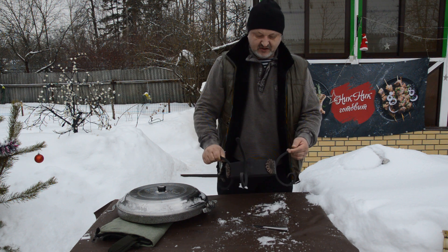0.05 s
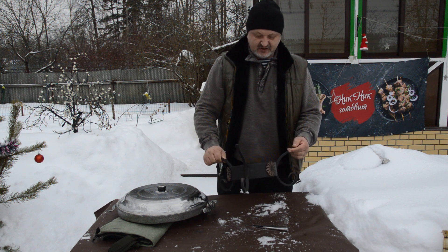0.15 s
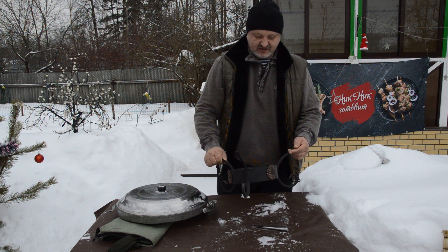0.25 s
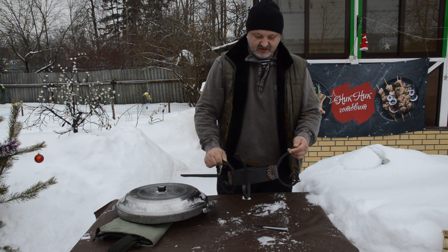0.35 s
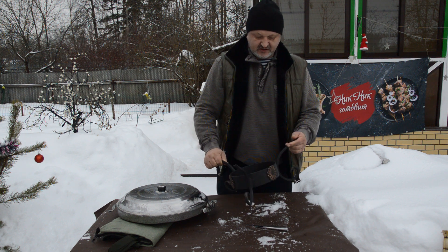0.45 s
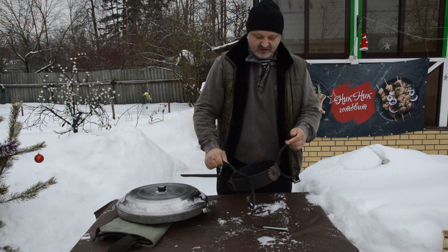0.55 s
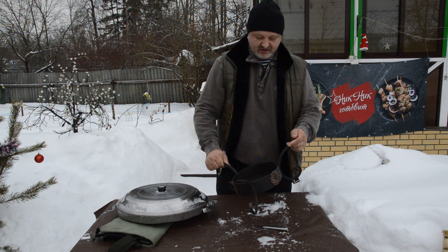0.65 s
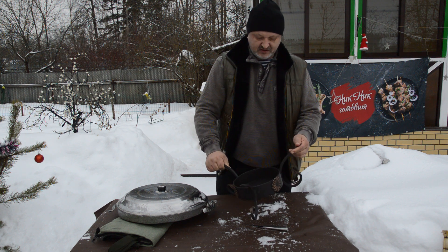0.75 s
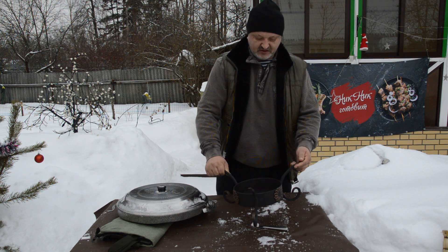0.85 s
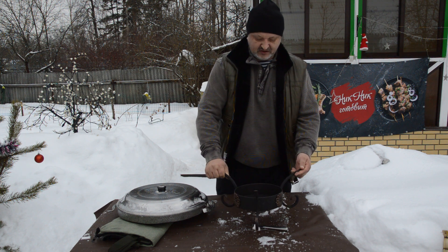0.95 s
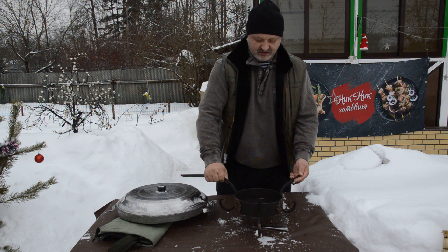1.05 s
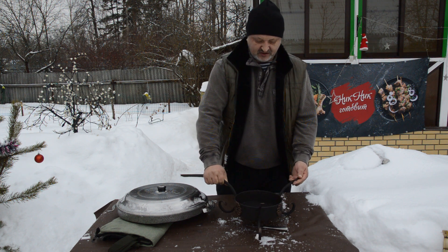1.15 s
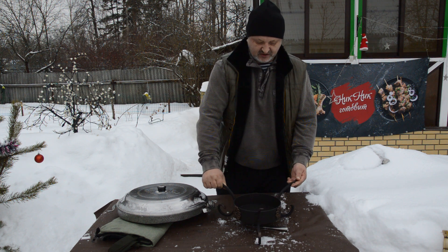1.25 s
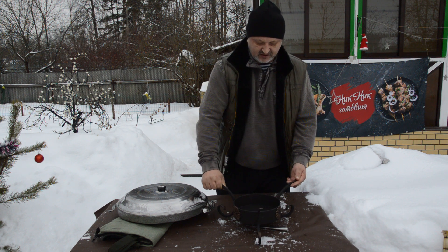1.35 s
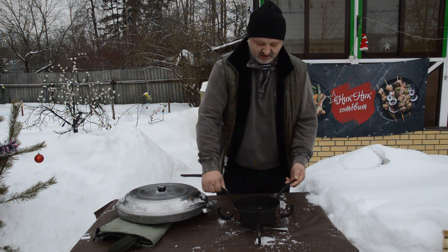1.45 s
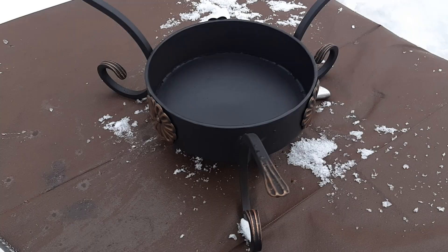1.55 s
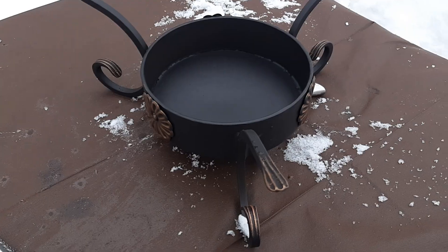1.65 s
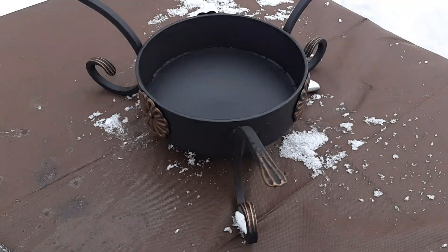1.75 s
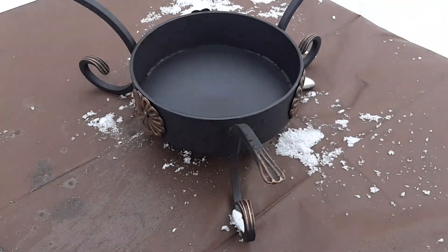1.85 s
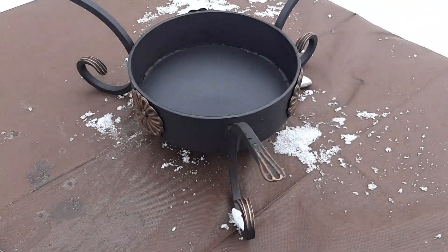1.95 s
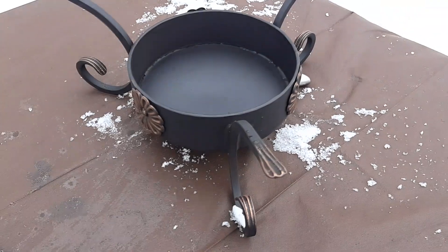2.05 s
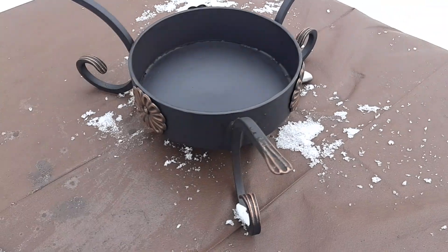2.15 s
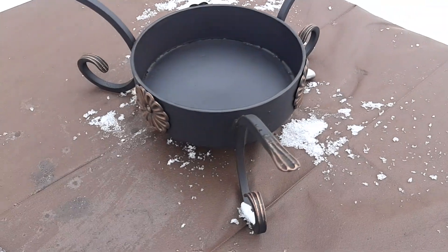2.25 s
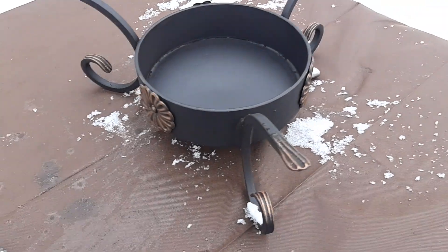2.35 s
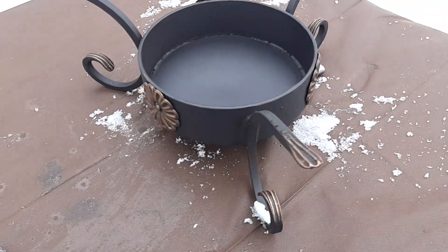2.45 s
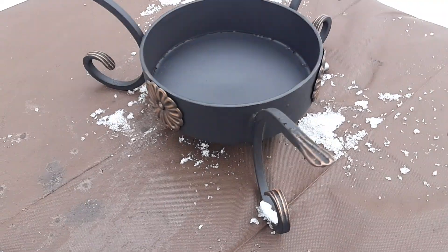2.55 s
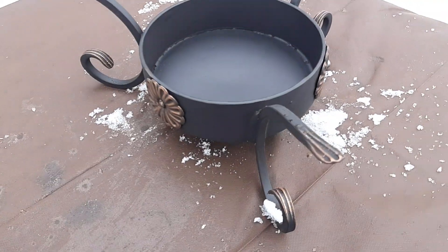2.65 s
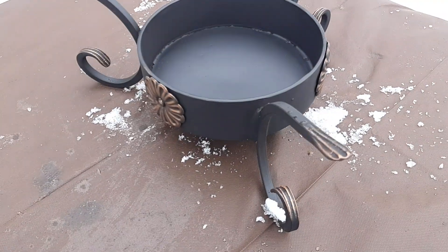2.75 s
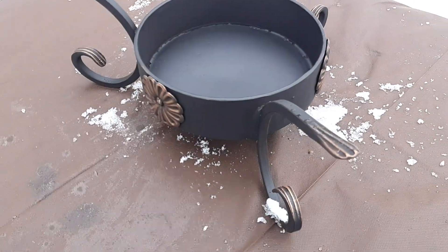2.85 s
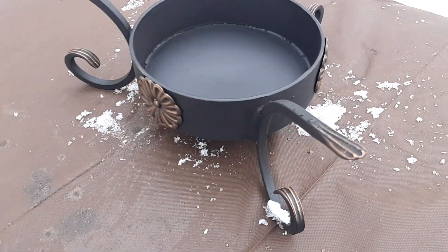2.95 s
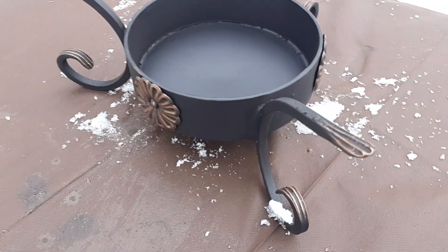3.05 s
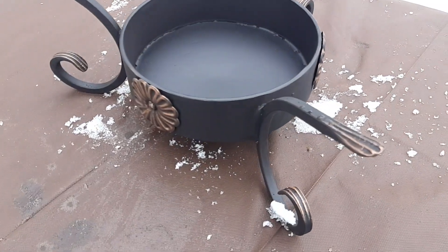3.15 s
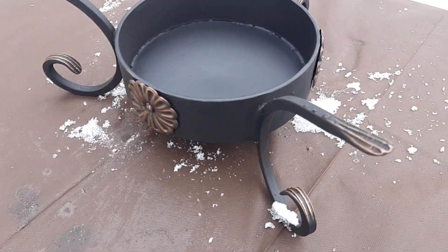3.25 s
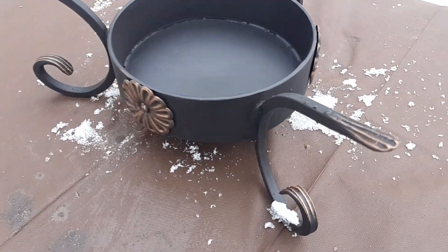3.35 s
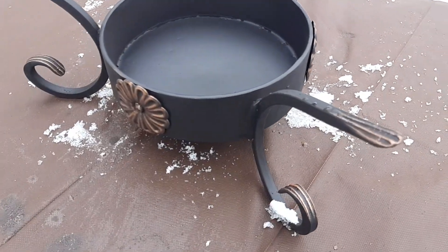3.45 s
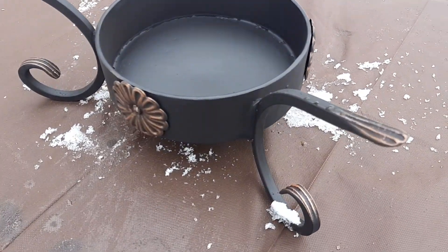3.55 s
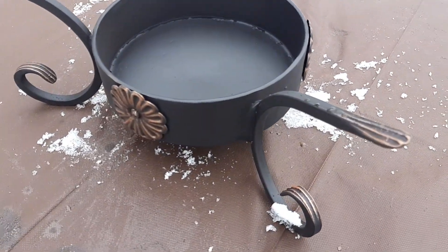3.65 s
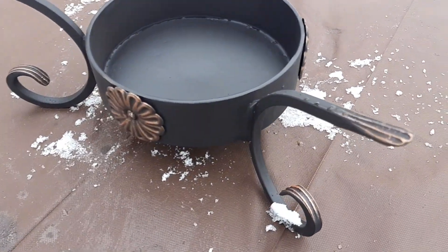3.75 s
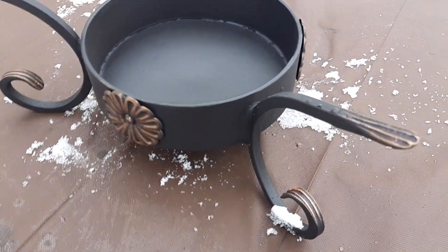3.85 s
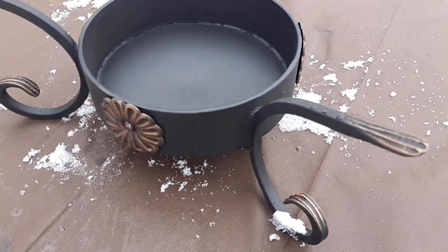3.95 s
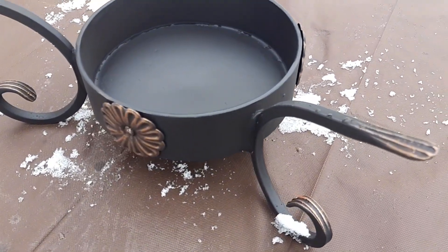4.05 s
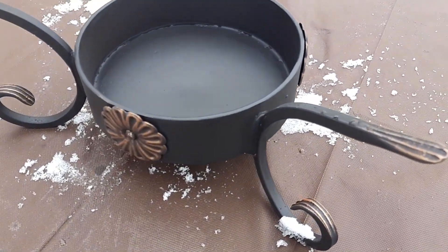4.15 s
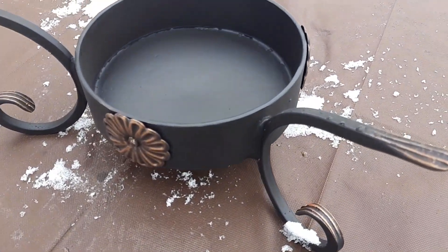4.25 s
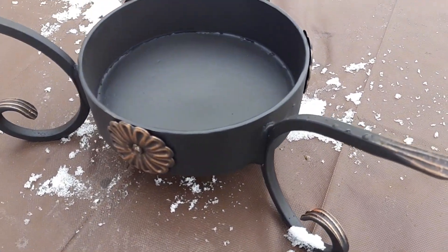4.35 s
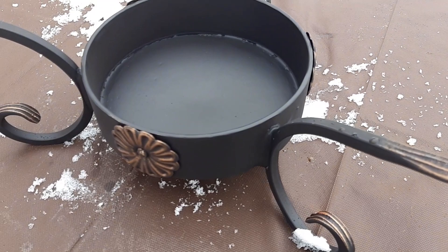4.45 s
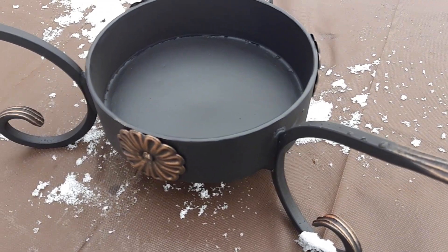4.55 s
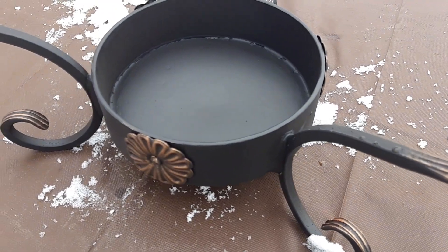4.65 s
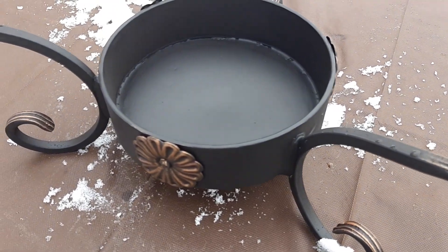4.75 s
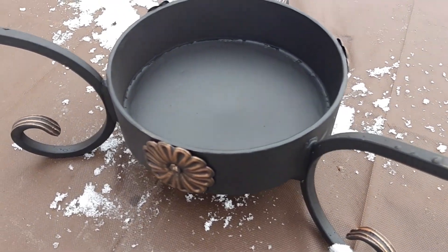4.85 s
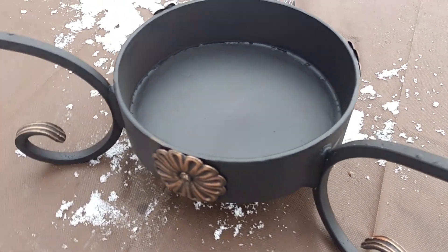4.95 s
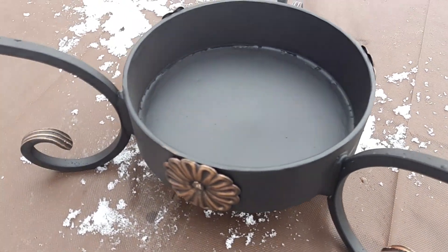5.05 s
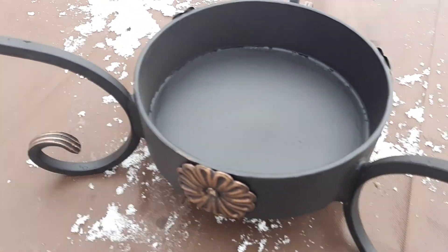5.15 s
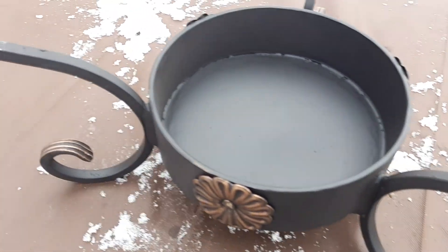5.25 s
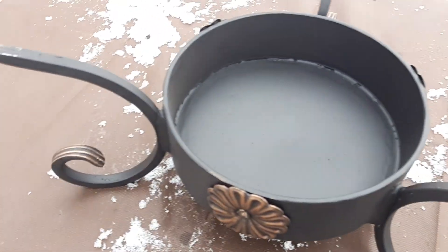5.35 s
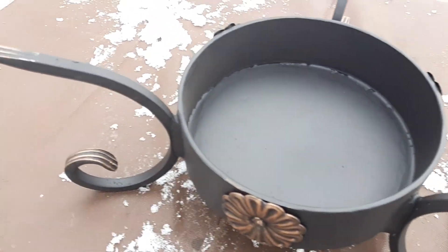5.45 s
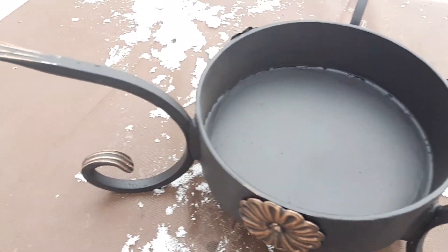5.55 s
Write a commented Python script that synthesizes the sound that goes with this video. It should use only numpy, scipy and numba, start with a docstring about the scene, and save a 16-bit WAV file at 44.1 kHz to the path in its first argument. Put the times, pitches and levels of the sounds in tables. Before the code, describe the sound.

In a snowy yard, low distant traffic rush and thin bird whistles precede a heavy steel stand landing on a covered table, with a boomy double thud and a second hard thump. The far microphone is nearly mono. After a brief near-silence, a close handheld stereo camera gives soft hiss with irregular plastic clicks, dull knocks and finger taps.

```python
"""A heavy steel stand thuds onto a covered table in a snowy yard: decaying modes, rumble and cracks of noise.
A bird's gliding tones, a steady thin tone and shaped traffic hiss join it in a distant, nearly mono
microphone with gain control. After a cut and a short near-silence, a hand-held stereo camera hears its own
two-port hiss while fingers make its plastic body click, knock, tap and rustle: noise and snaps through
shell resonances, single swings and low modes. Two faint tones dive and climb back."""
import sys
import numpy as np
from scipy import signal
from scipy.fft import rfft, irfft, next_fast_len
from scipy.io import wavfile
from scipy.ndimage import uniform_filter1d, map_coordinates
from numba import njit

SR = 44100
rng = np.random.default_rng(int(sys.argv[2]) if len(sys.argv) > 2 else 0)


def to_wav(sig):
    """Store sig (one row per channel, or 1-D mono) as 16-bit WAV at the path in sys.argv[1].

    Samples outside -1..1 are clipped; the rate is SR.
    """
    pcm = np.clip(np.atleast_2d(sig), -1, 1) * 32767
    pcm = np.round(pcm).astype(np.int16)
    wavfile.write(sys.argv[1], SR, pcm.T)  # frames by channels


def undo_db(level):
    """Turn decibels back into plain size, where 20 dB means ten times bigger."""
    steps = np.asarray(level, float) / 20
    return 10 ** steps


N = 246959

CUT_S, RESUME_S = 1.6005, 1.6335  # end of the first shot, start of the second
BACKGROUND_TOP_HZ = 15800

# The stand's legs land and rock. Each row: start in seconds, then boom, low drum, high drum and knock in dB.
BLOWS = [(1.2886, -8.5, -20.5, -20, -16.5), (1.2913, -11, -9, -20.5, -18.5), (1.3088, -13, -21, -26, -22.5),
         (1.3187, -12.5, -16, -34, -30.5), (1.34, -26, -10, -25.5, -33), (1.358, -32, -15.5, -30, -43),
         (1.372, -32, -18, -21, -40), (1.405, -32, -30.5, -30.5, -48), (1.433, -35, -23.5, -33, -48.5),
         (1.4937, -3.5, -14, -6.5, -15), (1.511, -24, -33, -7.5, -36), (1.533, -32, -35, -33, -28),
         (1.5524, -17.5, -30, -18, -36), (1.586, -29.5, -42, -19.5, -35)]
# The crust of snow gives twice under each blow. Each row: delay in seconds, level in dB over the knock.
CRACKS = [(0, -7), (.0026, 3)]
# Modes of the table top under the stand. Each row: frequency in Hz, strength in dB, 60 dB decay in seconds.
BOOM_MODES = [(64.5, -23, 0.55), (85.5, -18, 0.68), (114.2, -10.5, 0.075), (126, 3.5, 0.15),
              (144, 2.5, 0.12), (172, -5, 0.15)]
# Low drum modes of the blow. Each row: frequency in Hz, strength in dB, 60 dB decay in seconds.
LOW_DRUM_MODES = [(204, -9.5, 0.084), (225.4, -0.5, .14)]
# High drum modes of the blow. Each row: frequency in Hz, strength in dB, 60 dB decay in seconds.
HIGH_DRUM_MODES = [(254.5, -1, 0.13), (314, -10, 0.063), (373, -6.5, 0.085)]
# Modes of the knocked steel. Each row: frequency in Hz, strength in dB, 60 dB decay in seconds.
STEEL_MODES = [(402.5, -9, .1), (523.6, -2.5, 0.14), (570, 0.5, .1), (609, 2, .06), (729, -10, 0.19),
               (878, -10, 0.08), (1046, -6.5, 0.03), (1300, -13.5, .04), (1666, -15.5, .03)]
# Bright clicks. Each row: start in seconds, level in dB, colour at 2 kHz in dB, colour at 10 kHz in dB,
# thump through the hand in dB.
CLICKS = [(1.933, -34.5, 8, 0, -60), (2.3447, -42, -2, 5, -55), (2.4423, -39, 9, -10.5, -49),
          (2.58, -19, 2, -9.5, -36), (2.6212, -38, 3, -4, -40), (2.6388, -21, 1.5, -4.5, -33.5),
          (2.852, -45, -3, 2.5, -60), (2.8819, -25, -1.5, 4, -46.5), (3.0776, -13, -7.5, 0.5, -40),
          (3.236, -33, 10.5, 1, -59), (3.2715, -11, 2, 4.5, -32), (3.3937, -21, -4, -5.5, -43.5),
          (3.555, -40, -7, -14, -56), (3.5774, -29, -11, -6, -65), (4.064, -21, 17.5, 7.5, -42),
          (4.2206, -29, 3, 4, -55), (4.2484, -11.5, 1.5, -5, -39), (4.2623, -27, 8, -1.5, -40.5),
          (4.5896, -35, 9, 1, -58), (4.6194, -47, 3, 4, -58), (5.122, -43, -8, -13, -58),
          (5.1472, -39.5, -4, -21, -48)]
# Resonances of the camera shell. Each row: frequency in Hz, width in Hz, strength in dB.
SHELL_MODES = [(910, 90, 2), (1520, 520, 2), (2115, 560, -0.5), (3200, 870, -1.5), (4090, 650, 1.5),
               (4820, 640, 1), (5950, 614, 3), (6436, 720, 0.5), (8500, 1300, -13.5), (10160, 860, -2.5),
               (11830, 1600, -8), (14760, 3000, -7)]
# Dull knocks. Each row: start in seconds, level in dB, frequency in Hz, left over right in dB.
KNOCKS = [(2.7798, -15, 1940, -0.8), (3.258, -34.5, 680, -3), (4.0395, -40.5, 613, -11),
          (4.489, -44, 800, -2), (4.5899, -32, 850, -3.5), (4.62, -43, 500, -12), (4.978, -45.5, 445, -15),
          (5.067, -41.5, 614, 0.5), (5.086, -45, 500, -11), (5.114, -45, 800, -5), (5.17, -40, 700, -12),
          (5.4847, -28, 1650, -11), (5.529, -44, 605, -11)]
# Dull taps through the hand. Each row: start in seconds, level in dB, frequency in Hz.
TAPS = [(1.879, -43.5, 139), (2.345, -42, 121), (2.695, -44, 221), (3.294, -44, 223), (3.867, -45, 132),
        (4.037, -42, 241), (4.671, -45.5, 112), (4.827, -47, 113)]
# Spectrum of the sliding finger. Each row: frequency in Hz, relative density in dB.
SLIDE_SPECTRUM = [(300, -120), (900, -14), (3000, -10), (6000, 7), (8000, -2), (10500, 2), (15500, -4),
                  (17000, -120)]
# Whistles. Each row: start in seconds, length in seconds, first Hz, last Hz, level in dB.
CHIRPS = [(0.944, 0.148, 3330, 3220, -49), (1.19, .068, 4770, 4480, -39), (1.455, 0.14, 3200, 3240, -53.5)]
# Faint diving tones, left then right. Each row: bottom in seconds, speed in Hz per second, level in dB.
SWEEPS = [(1.748, 3.3e5, -66), (1.797, 3.1e5, -66)]
# Steady thin tone of the first shot. Its one row: frequency in Hz, level in dB.
WHINE = (15628, -75)
# Far traffic and hiss of the first shot. Each row: frequency in Hz, relative density in dB.
YARD_SPECTRUM = [(13, -39), (22, 2.5), (44, -2), (80, -2.5), (242, -4), (356, -10), (885, -4.5),
                 (1490, -5.5), (2260, -13.5), (3320, -15.5), (4380, -24), (6440, -28.5), (14700, -31),
                 (16000, -31)]
# Coherence of the yard noise. Each row: frequency in Hz, left-right likeness from 0 to 1.
YARD_LIKENESS = [(60, 0.99), (2500, 1), (4500, 0.89), (7000, 0.69), (15000, 0.586)]
# Hiss of the second shot. Each row: frequency in Hz, relative density in dB.
HISS_SPECTRUM = [(13, -56), (22, -11), (125, -5.5), (229, -6.5), (328, -14), (618, -9.5), (1380, -8.5),
                 (1490, -9), (1810, -8.5), (2740, -15), (3920, -14), (6100, -25.5), (7600, -37),
                 (10900, -22.5), (16000, -29)]
# Coherence of the hiss apart from the left port's lead. Each row: frequency in Hz, likeness from 0 to 1.
HISS_LIKENESS = [(60, 0.59), (180, 1), (400, 0.3), (1000, 0.16), (3000, 0.19), (5500, 0.063), (15000, .02)]
# Balance of the hiss. Each row: frequency in Hz, left over right in dB.
HISS_BALANCE = [(60, 1.5), (180, -6.5), (550, -0.5), (1650, -2.5), (4970, 0), (15000, -2)]
# Course of the hiss. Each row: time in seconds, level in dB, extra treble in dB.
HISS_LEVEL = [(1.64, -52, -0.5), (2.1, -54.5, -3), (2.5, -54, -0.7), (3.2, -54, 2.5), (3.8, -54.5, 0.5),
              (4.1, -53, -1.2), (4.5, -54.5, 0.7), (4.9, -54.5, 2), (5.3, -55, 0.2), (5.6, -55, 0.3)]


def stand():
    """Modal impact: each landing excites table and steel modes, and noise from loose frame and snow crust."""
    out, t = np.zeros(N), np.arange(SR // 2) / SR
    for s, boom_db, low_db, high_db, knock_db in BLOWS:
        for late, crack_db in CRACKS:
            crack = filtered(rng.standard_normal(len(t)), lambda hz: 1 / (1 + (hz / 3300) ** 4))
            crack *= undo_db(-60 * t / 0.022) * (1 - np.exp(-t / 0.0004)) ** 1.5
            add(out, s + late, undo_db(knock_db + crack_db) * crack)
        low_drum = undo_db(low_db) * ring(LOW_DRUM_MODES, t, 0.0028)
        high_drum = undo_db(high_db) * ring(HIGH_DRUM_MODES, t, 0.0013)
        knock = undo_db(knock_db) * ring(STEEL_MODES, t, 0.00083)
        add(out, s, low_drum + high_drum + knock)
        # the loose frame rumbles
        rumble_band = lambda hz: 1 / (1 + (hz / 190) ** 4 + (75 / (hz + 1)) ** 4)
        rumble = undo_db(-10.5 - 60 * t / 0.34) * unit(filtered(rng.standard_normal(len(t)), rumble_band))
        # the top sinks, hence the minus, once the cover is crushed
        add(out, s + 0.001513, undo_db(boom_db) * (rumble - ring(BOOM_MODES, t, 0.0027)))
    # a small table radiates no deep bass
    out = no_bass(no_bass(out, hz=46.3), hz=46.3)
    return out + steel_ring()


def steel_ring():
    """Lightly damped resonance: the steel sings thinly, its phase and level wavering as it decays."""
    start_s, tone_hz, level_db, rise_s, t60_s = 1.308, 7370, -42.5, 0.01, 0.18
    since = np.maximum(np.arange(N) / SR - start_s, 0)
    sing = np.sin(2 * np.pi * tone_hz * since + 1.07 * wobble(150)) * (1 - np.exp(-since / rise_s))
    return np.sqrt(2) * undo_db(level_db - 60 * since / t60_s + 3.5 * wobble(120)) * sing


def clicks():
    """Source and resonator: a snap and a slip of noise ring the shell near the right port, which hears first."""
    slip_t60_s, pan_db = 0.016, -8.5
    echo_s, echo_db, echo_t60_s, echo_pan_db = 0.019, -21.5, 0.048, 1
    snap_db, snap_growth = 25, 0.31  # over the slip at 0 dB; harder clicks snap more
    port_lag_s = 0.00042
    lead = 128  # samples of room ahead of the zero-phase colouring
    out, t = np.zeros((2, N)), np.arange(2048) / SR
    # a wall answers every click, smeared and nearly central
    arrivals = [(0, 0, slip_t60_s, pan_db), (echo_s, echo_db, echo_t60_s, echo_pan_db)]
    for s, db, low_db, high_db, _ in CLICKS:
        colour = [(300, low_db - 26), (1100, low_db - 9.0), (2100, low_db), (4800, 0.0063),
                  (10000, high_db), (15000, high_db - 3)]
        for late, loss_db, t60, lean_db in arrivals:
            near, far = rng.standard_normal((2, len(t))) * undo_db(-60 * t / t60)
            # the snap, just after the slip begins
            near[8] -= undo_db(snap_db + snap_growth * (db + loss_db))
            slip = np.pad([0.31 * near + 0.65 * far, near], [(0, 0), (lead, 0)])
            pair = filtered(slip, lambda hz: shell(hz) * undo_db(along(colour, hz)))
            pair /= np.abs(pair).max(1, keepdims=True)
            # the ports add in power
            pair *= np.sqrt(2) * undo_db(db + loss_db + lean_db * np.array([[.5], [-.5]]))
            add(out[0], s + late - lead / SR + port_lag_s, pair[0])
            add(out[1], s + late - lead / SR, pair[1])
    return out


def shell(hz):
    """Modal superposition: damped resonators of alternating sign on a weak direct path."""
    total = 0.1
    for k, (centre, width, db) in enumerate(SHELL_MODES):
        damping = 1j * hz * width
        total = total + (-1) ** k * undo_db(db) * damping / (centre ** 2 - hz ** 2 + damping)
    return total


def knocks():
    """Blunt contact: about one swing, then weak table echoes; off centre, the left port hears it late."""
    swings, most_lag_s = 1.13, 0.00025
    out, t = np.zeros((2, N)), np.arange(1024) / SR
    for s, db, hz, pan_db in KNOCKS:
        swing = np.sin(2 * np.pi * hz * t) * (hz * t) * np.exp(-4.5 * hz * t / swings)
        swing = undo_db(db) * swing / np.abs(swing).max()
        lag = most_lag_s * np.tanh(abs(pan_db) / 3)
        for delay, gain_db in [(0, 1.5), (.001, -7), (.0023, -27)]:
            add(out[0], s + delay + lag, undo_db(gain_db + pan_db / 2) * swing)
            add(out[1], s + delay, undo_db(gain_db - pan_db / 2) * swing)
    return filtered(no_bass(out, hz=202.0), lambda hz: 1 / (1 + (hz / 4800) ** 6))


def taps(count=8):
    """Structure-borne sound: the hand carries low modes under each click, alone, and faintly at random."""
    thump_hz, faint_db, faint_hz = 224, -53, 172
    out, t = np.zeros(N), np.arange(SR // 8) / SR
    when, size, pitch = rng.random((count, 3)).T
    faint_s = RESUME_S + when * (N / SR - RESUME_S)
    # levels spread over 6 dB, pitches over an octave
    faint = zip(faint_s, faint_db + 6 * (size - .5), faint_hz * 2 ** (pitch - .5))
    thumps = [(row[0], row[-1], thump_hz) for row in CLICKS]
    for s, db, hz in thumps + list(TAPS) + list(faint):
        add(out, s, undo_db(db) * ring([(hz, 0, .045), (1.15 * hz, -8, .03)], t, 0.0019))
    return out * undo_db([[-3.5], [2.5]])


def slide():
    """Friction noise: a finger rubs the shell with a sudden start, a slow sag and a quick lift."""
    start_s, lasts_s, level_db = 2.345, 0.079, -55.5
    sag_db_per_s, lift_db_per_s = 35, 230  # the lift adds to the sag
    since = np.arange(N) / SR - start_s
    db = level_db - sag_db_per_s * since - lift_db_per_s * np.maximum(since - lasts_s, 0)
    level = (since > 0) * undo_db(np.minimum(db, 0) + 0.92 * wobble(90))
    return level * rush(SLIDE_SPECTRUM, [(1000, .2)], patchy_db=1) * undo_db([[-2.2], [2.2]])


def bird():
    """Frequency-modulated tone: short thin whistles glide, swell and stop."""
    out = np.zeros(N)
    for s, length, first_hz, last_hz, db in CHIRPS:
        u = np.arange(round(length * SR)) / (length * SR)
        swell_db = np.interp(u, [0, 0.74, 1], [-16, 0, -18])
        hz = last_hz + (first_hz - last_hz) * (1 - u) ** 1.6
        hz = hz * (1 + .004 * wobble(40)[:len(u)])
        level = np.sqrt(2) * undo_db(db + swell_db + 1.5 * wobble(90)[:len(u)])
        add(out, s, level * np.sin(2 * np.pi * np.cumsum(hz) / SR))
    return out


def sweeps():
    """Linear chirp: pitch proportional to the time from the bottom, heard only inside the band."""
    t, ports = np.arange(N) / SR, []
    for s, speed, db in SWEEPS:
        in_band = np.abs(t - s) * speed < BACKGROUND_TOP_HZ
        ports.append(undo_db(db + 1.6 * wobble(150)) * in_band * np.sin(np.pi * speed * (t - s) ** 2))
    return np.array(ports)


def whine():
    """Pure tone: a steady thin sine."""
    hz, db = WHINE
    return np.sqrt(2) * undo_db(db) * np.sin(2 * np.pi * hz * np.arange(N) / SR)


def yard():
    """Coloured noise: the traffic draws slowly nearer, so its level climbs."""
    start_db, swell_db_per_s = -37.5, 1.02
    db = start_db + swell_db_per_s * np.arange(N) / SR + 0.29 * wobble(2.66)
    return undo_db(db) * rush(YARD_SPECTRUM, YARD_LIKENESS, patchy_db=0.52)


def hiss():
    """Partial coherence: port hiss plus far noise that leads on the left; handling makes the bass lumpy."""
    port_s = 0.000498  # travel time between the two ports
    bass_db, air_db = -1.2, -3
    db, treble_db = curves(HISS_LEVEL)
    half = np.array([[.5], [-.5]])
    lean = lambda hz: undo_db(along(HISS_BALANCE, hz) * half) * np.exp(2j * np.pi * hz * port_s * half)
    noise = filtered(rush(HISS_SPECTRUM, HISS_LIKENESS, patchy_db=1.28), lean)
    bass = filtered(noise, lambda hz: 1 / (1 + (hz / 350) ** 4))
    treble = filtered(noise, lambda hz: 1 / (1 + (3500 / (hz + 1)) ** 4))
    air = filtered(treble, lambda hz: 1 / (1 + (7500 / (hz + 1)) ** 8))
    lumps = undo_db(bass_db + 0.61 * wobble(3.01) + 0.88 * wobble(25))
    air_gain = undo_db(air_db + 1.2 * treble_db + 1.2 * wobble(3.02))
    middle = noise - bass - treble
    return undo_db(db) * (middle + lumps * bass + undo_db(treble_db) * (treble - air) + air_gain * air)


def rush(spectrum, alike, patchy_db):
    """Mid-side coherence: stereo noise with a mid of rms 1 and time-frequency patches of random gain."""
    z = signal.stft(rng.standard_normal((2, N)), nperseg=512)[2]
    field = uniform_filter1d(rng.standard_normal(z.shape[1:]), size=6, axis=0)
    field = uniform_filter1d(field, size=12, axis=1)
    pair = signal.istft(z * undo_db(patchy_db * unit(field)), nperseg=512)[1][:, :N]

    def response(hz):
        """Coherence as an angle: its half-angle tangent is the side's share."""
        side_share = np.tan(np.arccos(np.clip(along(alike, hz), -.5, 1)) / 2)
        colour = undo_db(along(spectrum, hz)) * (hz < BACKGROUND_TOP_HZ)
        return colour * np.array([np.ones_like(hz), side_share])

    mid, side = filtered(pair, response)
    return np.array([mid + side, mid - side]) / np.std(mid)


def ring(modes, t, attack):
    """Modal decay: damped sines from rest, at slightly new strengths each blow."""
    total = 0
    for hz, db, t60 in modes:
        strength_db = db + 1.2 * rng.standard_normal()
        total = total + undo_db(strength_db - 60 * t / t60) * np.sin(2 * np.pi * hz * t)
    return total * (1 - np.exp(-t / attack))


def no_bass(x, hz):
    """Second-order resonator: a causal high-pass."""
    return filtered(x, lambda f: -(f / hz) ** 2 / (1 + 1.3j * f / hz - (f / hz) ** 2))


def filtered(x, response):
    """Convolution theorem: the spectrum of x times a complex response of frequency."""
    m = next_fast_len(x.shape[-1] + 4096)
    return irfft(rfft(x, m) * response(np.fft.rfftfreq(m, 1 / SR)), m)[..., :x.shape[-1]]


def unit(x):
    """Power normalisation: scale to rms 1."""
    return x / np.sqrt(np.mean(x ** 2) + 1e-20)


def along(points, hz):
    """Logarithmic pitch scale: interpolate (Hz, value) points on it."""
    f, v = np.transpose(points)
    return np.interp(np.log(hz + 1), np.log(f + 1), v)


def curves(rows):
    """Linear interpolation: one value per sample for each column after the time."""
    s, *cols = np.transpose(rows)
    return [np.interp(np.arange(N) / SR, s, c) for c in cols]


def wobble(rate):
    """Band-limited fluctuation: a smooth random curve, rate knots a second."""
    knots = rng.standard_normal(int(N * rate / SR) + 4)
    return map_coordinates(knots, [np.arange(N) * rate / SR])


def add(out, s, x):
    """Superposition: mix x into out from time s."""
    i = round(s * SR)
    out[..., i:i + x.shape[-1]] += x[..., :out.shape[-1] - i]


@njit
def held_peak(level, rise, fall):
    """Peak detection: a follower that is fast up and slow down."""
    out = np.zeros(len(level))
    for i in range(1, len(level)):
        rate = rise if level[i] > out[i - 1] else fall
        out[i] = out[i - 1] + rate * (level[i] - out[i - 1])
    return out


def gain_control(x, knee_db=-17, slope=0.52, attack=0.0033, release=0.087):
    """Compression: loud peaks pull the gain down within milliseconds; it creeps back."""
    peak = held_peak(np.abs(x).max(0), 1 / (attack * SR), 1 / (release * SR))
    gain = np.maximum(peak / undo_db(knee_db), 1) ** -slope
    return x * uniform_filter1d(gain, size=90)


def first_shot():
    """Superposition before compression: stand, bird, thin tone and yard through the far microphone."""
    return gain_control(stand() + bird() + whine() + yard())


def second_shot():
    """Superposition: handling sounds and faint tones over the camera's hiss."""
    return clicks() + knocks() + taps() + slide() + sweeps() + hiss()


def scene():
    """Cross-fade in time: two shots with a nearly silent gap between them."""
    cut_fade_s, resume_fade_s = 0.0016, 0.00056
    t = np.arange(N) / SR
    first = first_shot()
    # a faint, dull, fading remnant of the first shot
    remnant = filtered(first, lambda hz: 1 / (1 + (hz / 1500) ** 4))
    gap = undo_db(-29 - 300 * np.clip(t - CUT_S, 0, .1)) * remnant
    kept = np.sin(np.pi / 2 * np.clip((CUT_S - t) / cut_fade_s + .5, 0, 1)) ** 2
    resumed = np.clip((t - RESUME_S) / resume_fade_s, 0, 1)
    return kept * first + (1 - kept) * gap + resumed * second_shot()


def band_limit(x):
    """A steep low-pass at the top of the band."""
    return signal.sosfilt(signal.butter(12, 17110, fs=SR, output="sos"), x)


def record(dry):
    """Band limitation: a steep low-pass at 16.5 kHz finishes the mix."""
    limited = filtered(dry, lambda hz: 1 / (1 + (hz / 16500) ** 80))
    return band_limit(limited)


dry = scene()
out = record(dry)
to_wav(out)
```